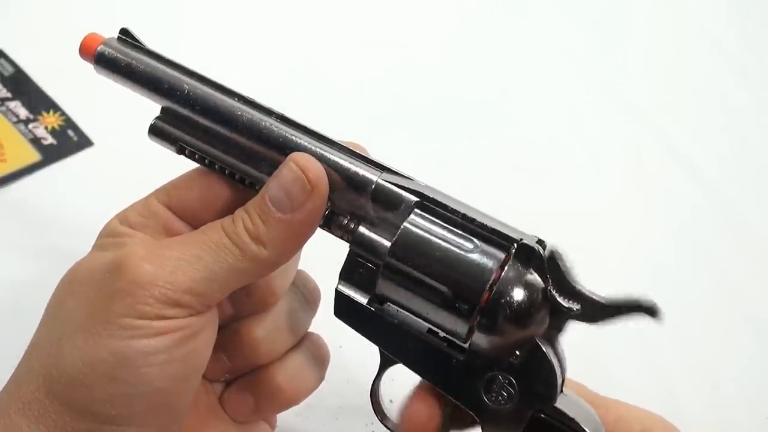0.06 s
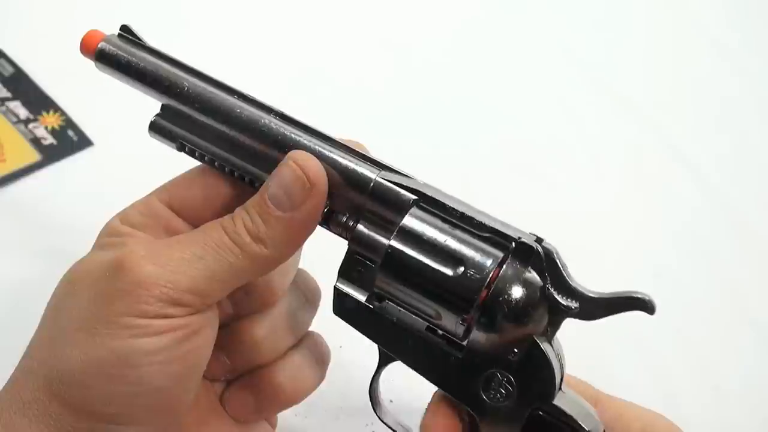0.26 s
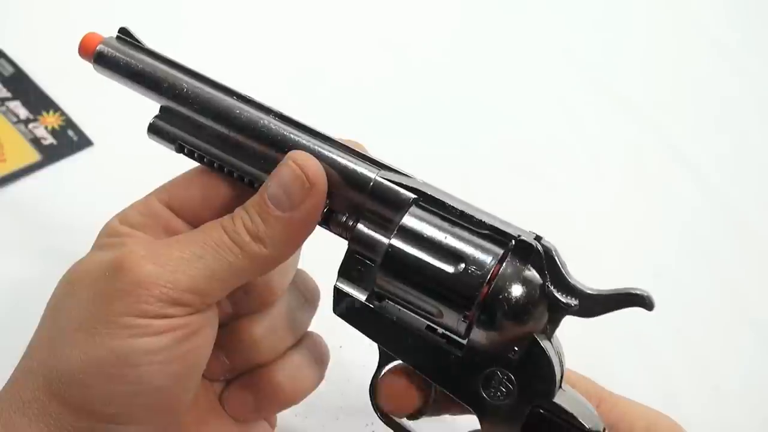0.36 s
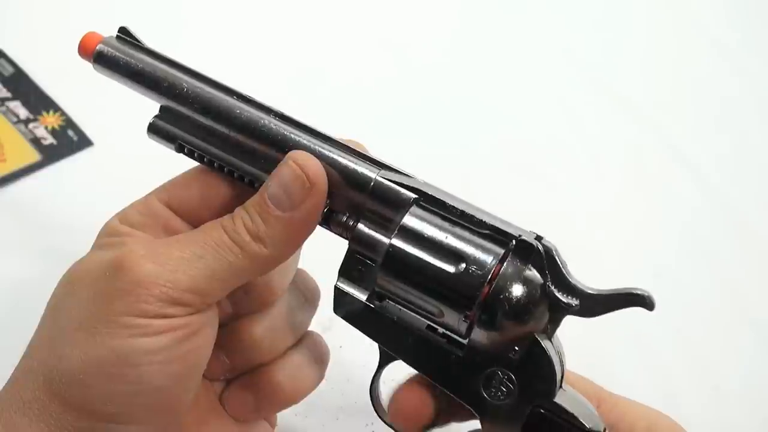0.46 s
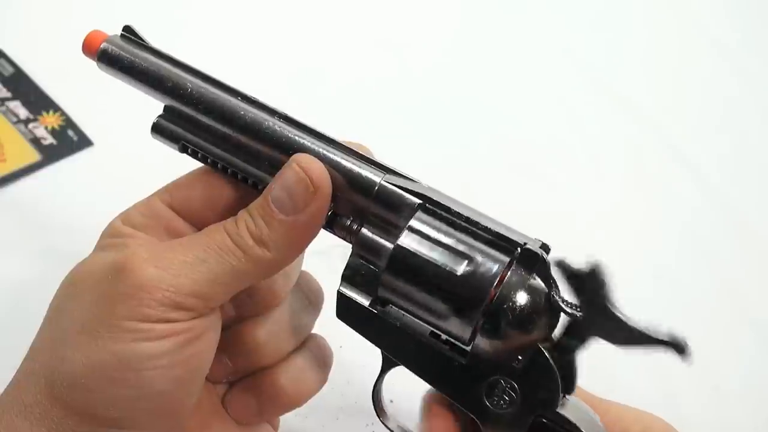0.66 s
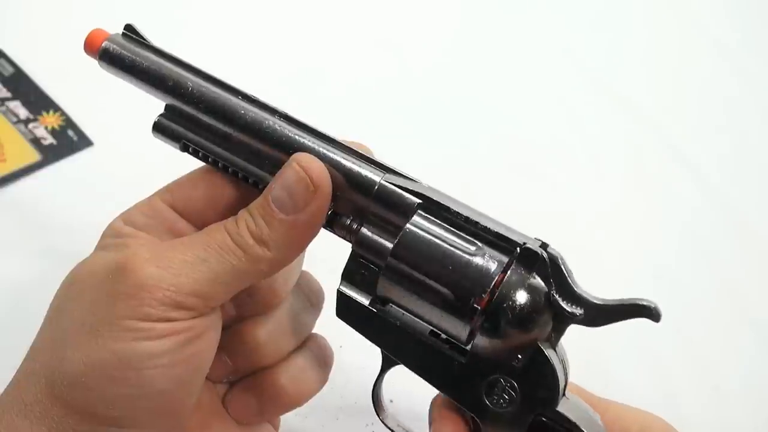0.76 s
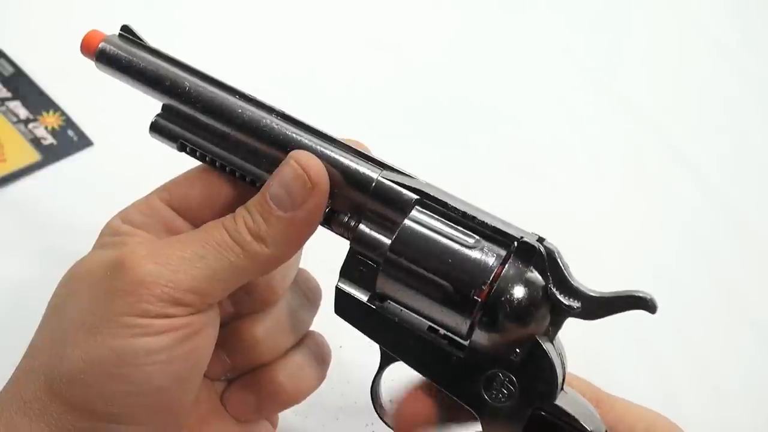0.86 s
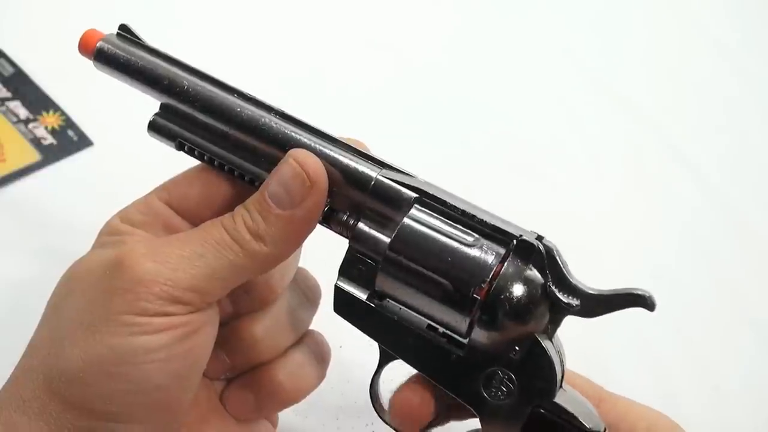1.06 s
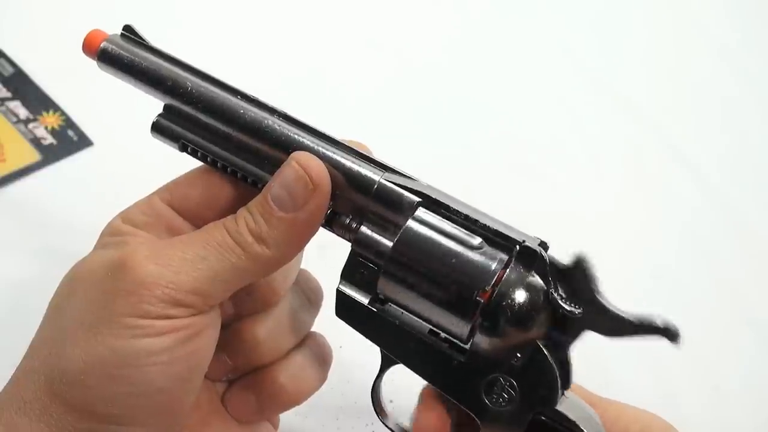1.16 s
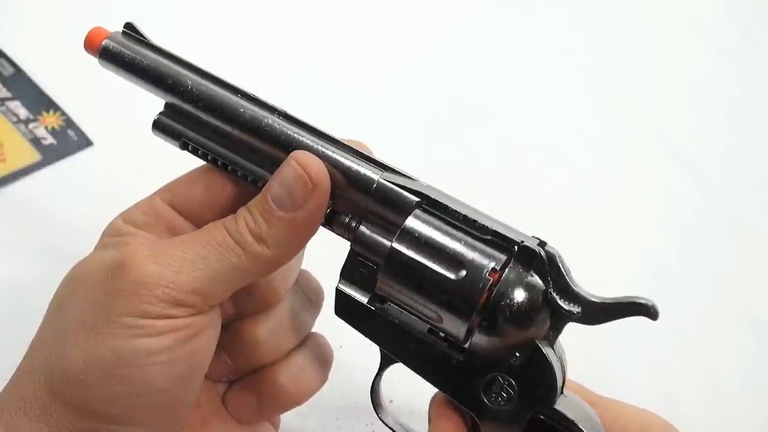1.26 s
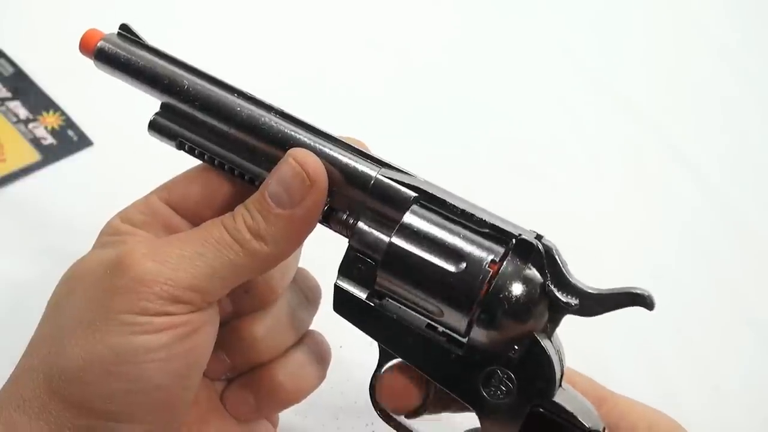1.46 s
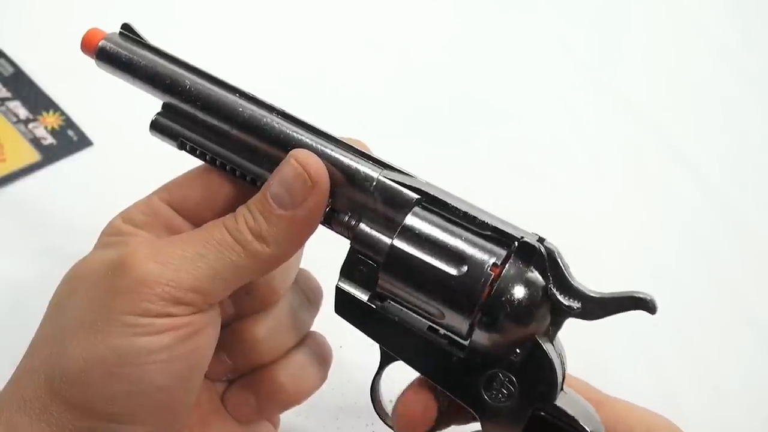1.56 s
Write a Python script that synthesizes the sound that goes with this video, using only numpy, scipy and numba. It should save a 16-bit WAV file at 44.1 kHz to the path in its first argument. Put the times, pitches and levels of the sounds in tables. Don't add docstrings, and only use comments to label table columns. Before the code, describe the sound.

A die-cast toy revolver fires three caps close up, about half a second apart; light cylinder ticks lead to each sharp crack, then the trigger snaps back, in a small quiet furnished room, close stereo microphone.

```python
import sys
import numpy as np
from scipy import signal
from scipy.fft import rfft, irfft
from scipy.io import wavfile
from numba import njit

SR = 44100
rng = np.random.default_rng(int(sys.argv[2]) if len(sys.argv) > 2 else 0)


def how_loud(loudness_db):
    steps = np.asarray(loudness_db, float) / 20
    return 10 ** steps


def int16_out(signal):
    q = np.round(np.clip(np.atleast_2d(signal).T, -1, 1) * 32767)
    wavfile.write(sys.argv[1], SR, q.astype(np.int16))


N = 70560
HZ = np.fft.rfftfreq(2 * N, 1 / SR)

# t/s, level/dB, brightness/(dB/octave), thump/dB
SHOTS = [
    (0.2062, 23, 0.34, -25.5),
    (0.75, 17, 1.73, -42),
    (1.264, 20.5, 1.3, -36.5),
]
# t/s, level/dB, f/Hz
RESETS = [
    (0.391, -36, 2700),
    (0.3952, -22, 3370),
    (0.9457, -37.5, 2850),
    (0.9482, -21.5, 2980),
    (1.4349, -37.5, 2850),
    (1.4386, -21.5, 3010),
]
# t/s, level/dB, f/Hz
TICKS = [(0.0564, -47, 2800), (0.0644, -39, 2650), (0.0796, -34.5, 2550), (0.1391, -37, 2560),
         (0.1461, -48.5, 4080), (0.1488, -32, 2210), (0.1602, -43, 2960), (0.1703, -44.5, 1990),
         (0.5413, -41, 2435), (0.6855, -47, 2150), (0.6973, -32.5, 2340), (0.7064, -41.5, 2300),
         (0.7157, -34.5, 2810), (0.9085, -38, 2640), (1.1406, -33, 2520), (1.1966, -43, 3300),
         (1.2088, -34.5, 2240), (1.2147, -47, 2270), (1.2304, -39.5, 2650), (1.4058, -36, 2800),
         (1.5557, -46, 2800), (1.5883, -38, 2314)]
# t/s, level/dB, f/Hz
SEARS = [
    (.1815, -52, 3000),
    (.732, -46, 2700),
    (1.2455, -45, 2600),
]
# t/s, length/s, level/dB
SWELLS = [
    (.1965, .011, -34),
    (.739, .011, -36),
    (1.251, .014, -36),
]
# f/Hz, level/dB
CAP_SPECTRUM = [(100, -24), (300, -10), (800, -6), (1500, 0.77), (2200, -1.5), (4500, -11.5), (9500, -18),
                (13000, -12)]
# f/Hz, level/dB, t60/s
BODY_MODES = [(110, -20, .07), (180, -13, .13), (292, -9, .16), (571, -11, .18), (789, -11, .14),
              (1135, -6, .15), (1402, 0.1, .17), (1543, -4, .14), (1829, -4, .15), (1906, -5, .13),
              (2094, -10, .12), (2515, -11, .11)]
# f/Hz, level/dB, t60/s
PART_MODES = [(780, -18, .06), (2720, 0.1, .035), (2800, -2, .04), (3182, -8, .06), (3590, -10, .05),
              (3736, -18, .14), (4544, -20, .16), (5082, -12, .04), (6500, -12, .04)]
# f/Hz, level/dB
SNAP_SPECTRUM = [(400, -43.5), (800, -14.5), (1800, -4), (2900, 1.23), (6500, -3.5), (9500, -16.5),
                 (13000, -8.5), (16000, -6.5)]
# f/Hz, level/dB, t60/s
FRAME_MODES = [(1125, -67, 4), (1579, -76, 5), (1610, -72, 5), (2026, -76, 5), (2083, -73, 5),
               (2487, -76, 4), (2557, -78, 4), (2650, -75, 4), (2697, -78, 4), (3268, -75, 4),
               (3833, -80, 3), (4540, -78, .5)]
# f/Hz, t60/s
ROOM_T60 = [(60, .06), (130, 0.089), (300, 0.25), (1400, 0.16), (4000, 0.19), (8000, 0.18), (15000, 0.11)]
# f/Hz, level/dB
SIDE_SPECTRUM = [(60, -7), (150, -11), (500, -13), (2500, -13), (4000, -12), (5500, 1.5), (10500, 1.2),
                 (12000, -16)]
# f/Hz, level/dB
FLOOR_SPECTRUM = [(30, -20), (110, -2), (270, 0.1), (420, -9), (1200, -16), (3000, -24), (6000, -36),
                  (16000, -46)]

EARLIER_RING_DB, SCATTER_DB, FLOOR_DB = -5, 2, -71
TICK_Q, TICK_TONE_DB, TICK_TRIM_DB = 15, -6.5, -6.5
TICK_DULL_DB_PER_OCT, TICK_GRIT_S, TICK_GRIT_DB = -9, 0.0042, -11.5
SNAP_GRIT_S, SNAP_GRIT_DB, PARTS_DB, ACTION_DIRECT_DB = 0.0023, -10.5, -18, 6
SWELL_ATTACK_S, SWELL_HZ, SWELL_RISE_DB = .002, 1300, 8
CAP_BURN_S, CAP_FIZZ_DB, CAP_BODY_DB = .002, -26, -14
THUMP_HZ, THUMP_T60_S = 102, 0.05
ROOM_DB, EARLY_DB, EARLY_S, LATE_DB, LATE_T60_S = 5.5, 4, 0.014, -49.5, 0.2
SIDE_PHASED, LEFT_DB = .15, 3
CEILING_DB, ATTACK_S, RELEASE_S, LOOK_S, TOP_HZ = -10, 0.0009, 0.0081, .001, 15800


def table(rows, hz=HZ):
    r = np.array(rows, float)
    return np.interp(np.log(np.maximum(hz, 1)), np.log(r[:, 0]), r[:, 1])


def colour(x, db):
    cepstrum = irfft(db * np.log(10) / 20)
    cepstrum[1:N] *= 2
    cepstrum[N + 1:] = 0
    return irfft(rfft(x, 2 * N) * np.exp(rfft(cepstrum)))[..., :x.shape[-1]]


def fade(t, t60):
    return np.exp(-np.log(1000) * t / np.maximum(t60, .002))


def ring(modes, t):
    hz, db, t60 = np.array(modes, float).T[..., None]
    strength, phase = rng.standard_normal((2, len(modes), 1))
    tones = np.sin(2 * np.pi * hz * t + 2 * phase) * fade(t, t60)
    return np.sum(how_loud(db + SCATTER_DB * strength) * tones, axis=0)


def add(track, s, x):
    i = int(s * SR)
    track[i:i + len(x)] += x[:len(track) - i]


def frame():
    out, t = np.zeros(N), np.arange(N) / SR
    add(out, 0, how_loud(EARLIER_RING_DB) * ring(FRAME_MODES, t))
    for shot in SHOTS:
        out[int(shot[0] * SR):] = 0
        add(out, shot[0], ring(FRAME_MODES, t))
    return out


def floor_noise():
    noise = colour(rng.standard_normal((2, N)), table(FLOOR_SPECTRUM))
    return noise / noise.std() * how_loud(FLOOR_DB)


def click(t, hz):
    tone = np.sin(2 * np.pi * hz * t) * np.exp(-t * hz / TICK_Q)
    return (t == 0) + how_loud(TICK_TONE_DB) * tone * 0.13


def grit(t, db, decay_s):
    return how_loud(db) * rng.standard_normal(len(t)) * np.exp(-t / decay_s)


def action():
    out, t = np.zeros(N), np.arange(SR // 4) / SR
    snap = table(SNAP_SPECTRUM)
    dull = snap + TICK_DULL_DB_PER_OCT * np.log2(np.maximum(HZ / 3000, 1))
    light = [(s, db + TICK_TRIM_DB, hz) for s, db, hz in TICKS] + list(SEARS)
    for s, db, hz in light:
        contact = click(t, hz) + grit(t, TICK_GRIT_DB, TICK_GRIT_S)
        add(out, s, how_loud(db) * 2 * colour(contact, dull))
    for s, db, hz in RESETS:
        parts = how_loud(PARTS_DB) * ring(PART_MODES, t) * np.minimum(t * 1000, 1)
        contact = click(t, hz) + grit(t, SNAP_GRIT_DB, SNAP_GRIT_S)
        add(out, s, how_loud(db) * (2 * colour(contact, snap) + parts))
    return out


def pre_swell():
    out, t = np.zeros(N), np.arange(SR // 50) / SR
    band = -9 * np.abs(np.log2(np.maximum(HZ, 30) / SWELL_HZ))
    for s, length, db in SWELLS:
        band_noise = colour(rng.standard_normal(len(t)), band)
        swell = how_loud(db + SWELL_RISE_DB * (t / length - 1))
        swell = swell * np.minimum(t / SWELL_ATTACK_S, 1) * (t < length)
        add(out, s, band_noise / band_noise.std() * swell)
    return out


def caps():
    t = np.arange(SR // 3) / SR
    blast, body = np.zeros(N), np.zeros(N)
    octaves = np.log2(np.maximum(HZ, 30) / 1500)
    for s, db, tilt, thump_db in SHOTS:
        fizz = how_loud(CAP_FIZZ_DB) * rng.standard_normal(len(t)) * np.exp(-t / CAP_BURN_S)
        crack = colour((t == 0) + fizz, table(CAP_SPECTRUM) + tilt * octaves)
        add(blast, s, how_loud(db) * crack * 4)
        onset = np.minimum(t / 0.007, 1)
        add(body, s, how_loud(db + CAP_BODY_DB) * ring(BODY_MODES, t) * onset * 0.21)
        thump = np.sin(2 * np.pi * THUMP_HZ * t) * fade(t, THUMP_T60_S)
        add(body, s, how_loud(thump_db) * 9 * thump)
    return blast, body


def room():
    t = np.arange(N // 2) / SR
    noise, tail = rfft(rng.standard_normal((2, N // 2))), 0
    octave = np.log2(np.maximum(np.fft.rfftfreq(N // 2, 1 / SR), 1))
    for c in np.arange(5, 15):
        band = irfft(noise * np.clip(1 - abs(octave - c), 0, 1))
        tail = tail + band * fade(t, table(ROOM_T60, 2. ** c))
    early = 1 + how_loud(EARLY_DB) * np.exp(-t / EARLY_S)
    late = how_loud(LATE_DB) * irfft(noise) * fade(t, LATE_T60_S)
    out = tail * early + late
    out = out / np.sqrt(np.sum(out[0] ** 2)) * how_loud(ROOM_DB)
    out[0, 0] += 1
    return out


def scene():
    blast, body = caps()
    metal = action()
    mid, far = irfft(rfft(blast + metal, 2 * N) * rfft(room(), 2 * N))[:, :N]
    floor = floor_noise()
    mid = mid + body + pre_swell() + how_loud(ACTION_DIRECT_DB) * metal + frame() + floor[0]
    far = far + floor[1]
    phased = 1j * np.sqrt(SIDE_PHASED) * rfft(mid, 2 * N)
    diffuse = np.sqrt(1 - SIDE_PHASED) * rfft(far, 2 * N)
    side = irfft((phased + diffuse) * how_loud(table(SIDE_SPECTRUM)))[:N]
    return np.array([(mid + side) * how_loud(LEFT_DB / 2), (mid - side) * how_loud(-LEFT_DB / 2)])


@njit
def follow(x, up, down):
    e, y = 0., np.empty(len(x))
    for i in range(len(x)):
        e += (x[i] - e) * (up if x[i] > e else down)
        y[i] = e
    return y


def roll_off(x):
    return signal.sosfilt(signal.butter(12, 16960, fs=SR, output="sos"), x)


def record(dry):
    peak = np.abs(dry).max(axis=0)
    envelope = follow(peak, 1 / (ATTACK_S * SR), 1 / (RELEASE_S * SR))
    gain = np.minimum(1, how_loud(CEILING_DB) / (envelope + 1e-9))
    gain = np.roll(gain, -int(LOOK_S * SR))
    low_pass = signal.ellip(8, .2, 40, TOP_HZ, fs=SR, output="sos")
    mix = signal.sosfilt(low_pass, np.tanh(dry * gain))
    return roll_off(mix)


dry = scene()
out = record(dry)
int16_out(out)
```